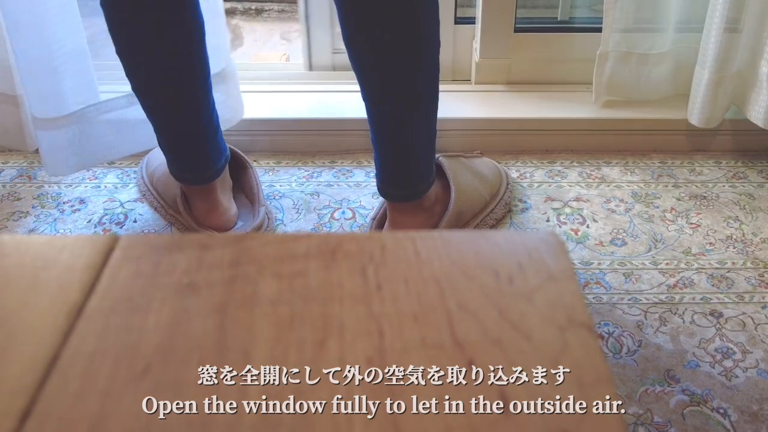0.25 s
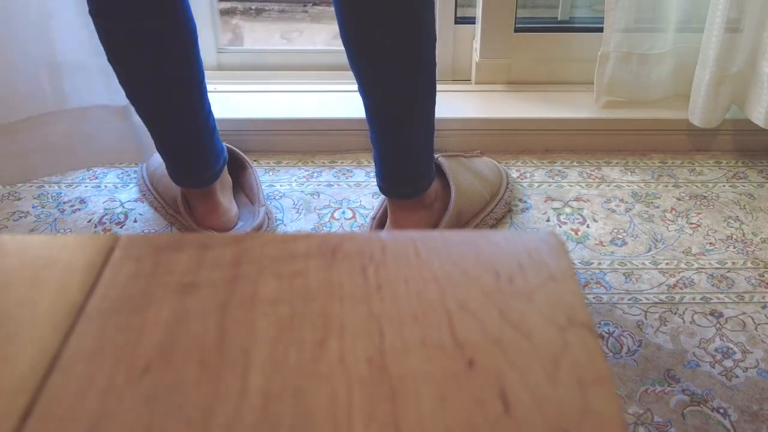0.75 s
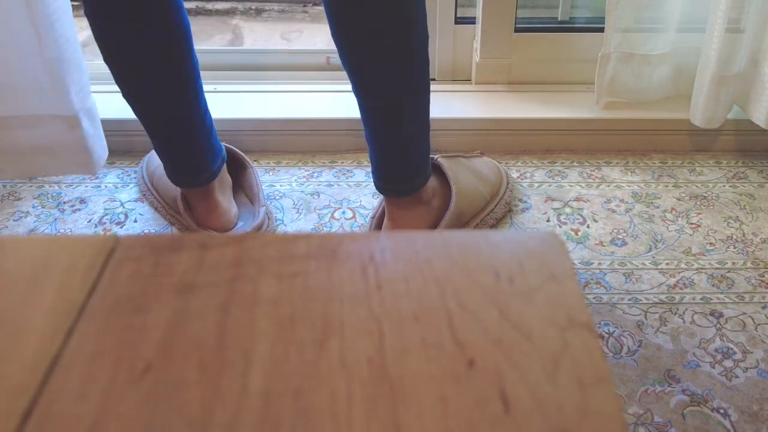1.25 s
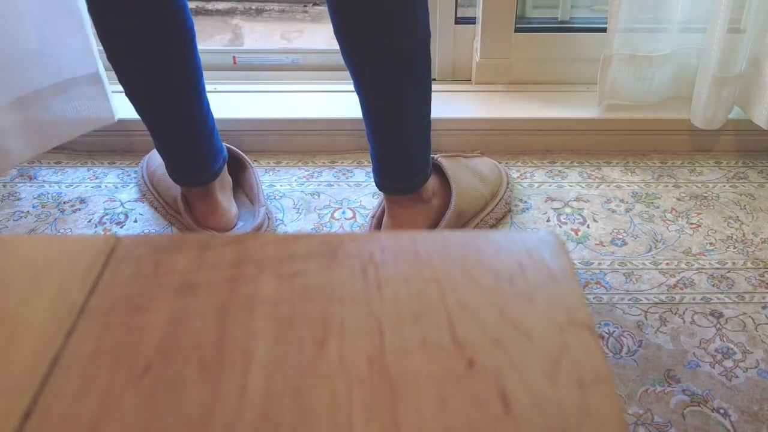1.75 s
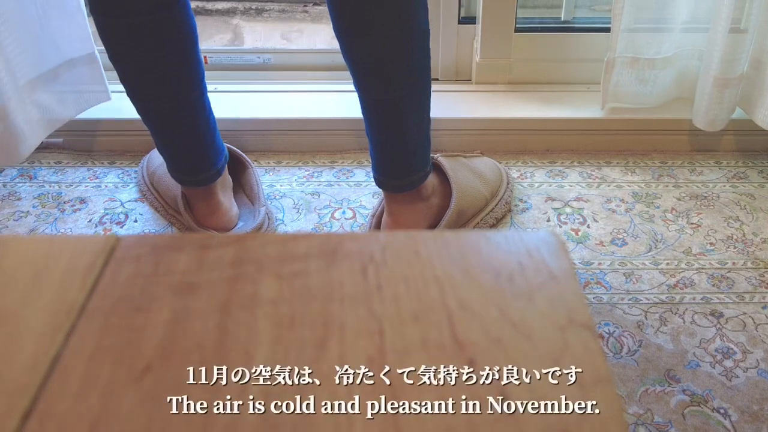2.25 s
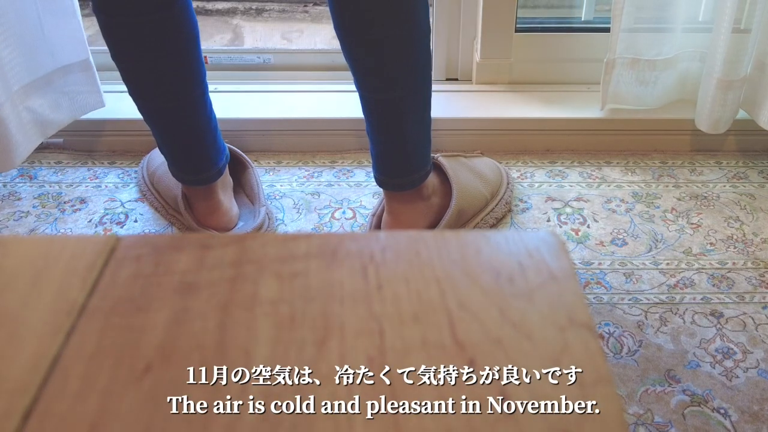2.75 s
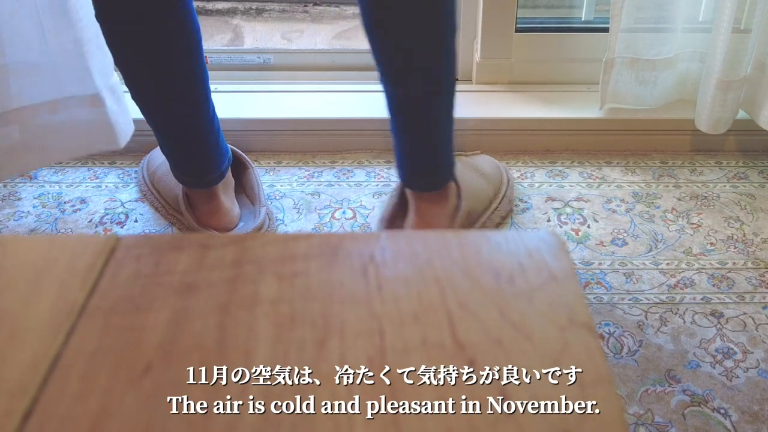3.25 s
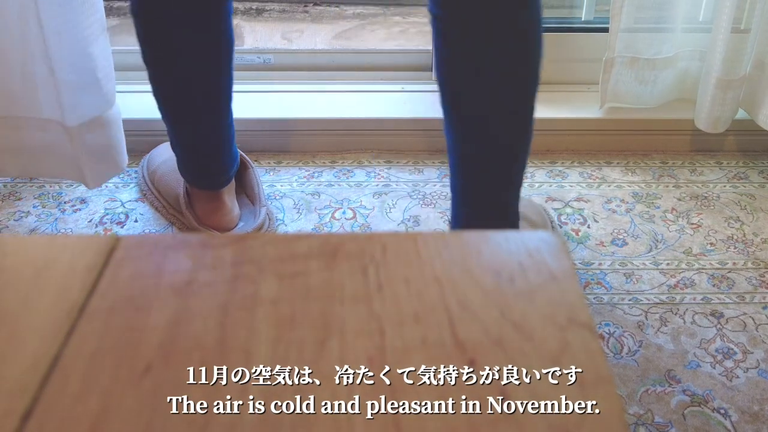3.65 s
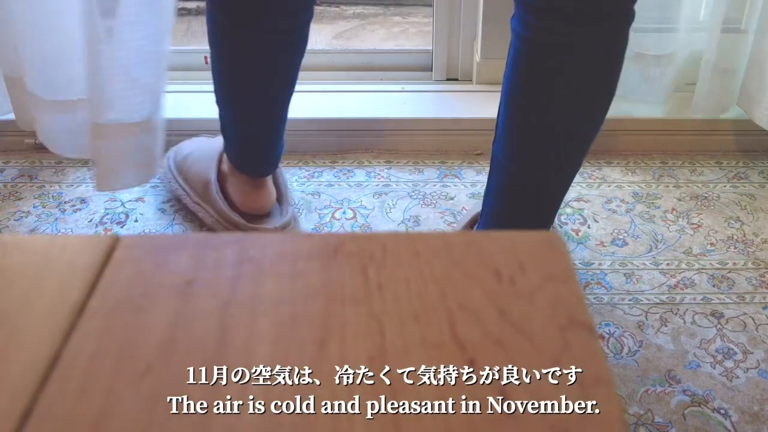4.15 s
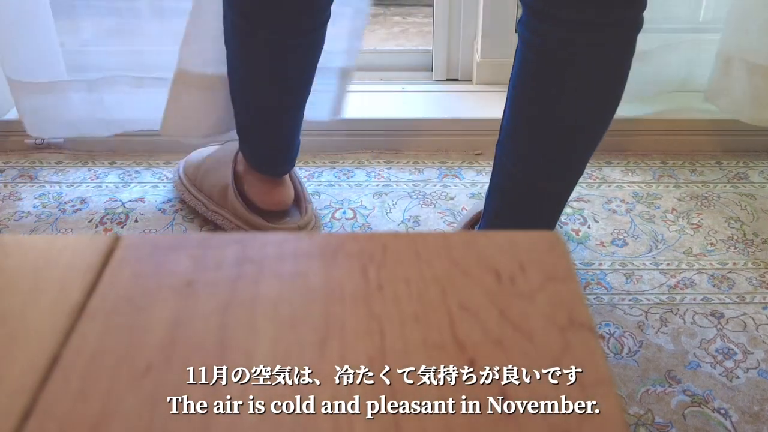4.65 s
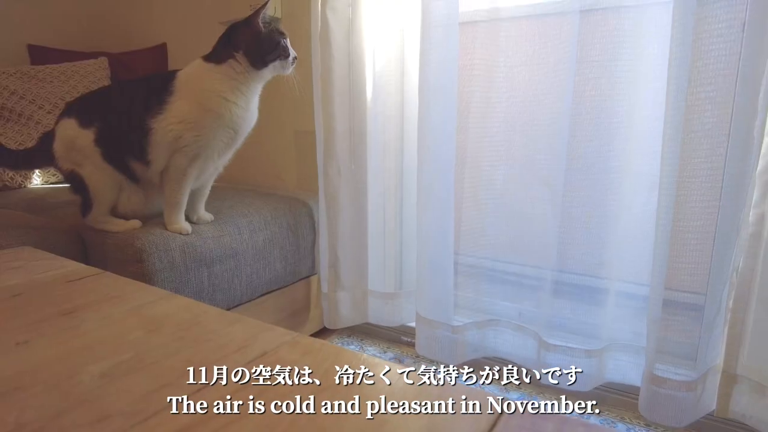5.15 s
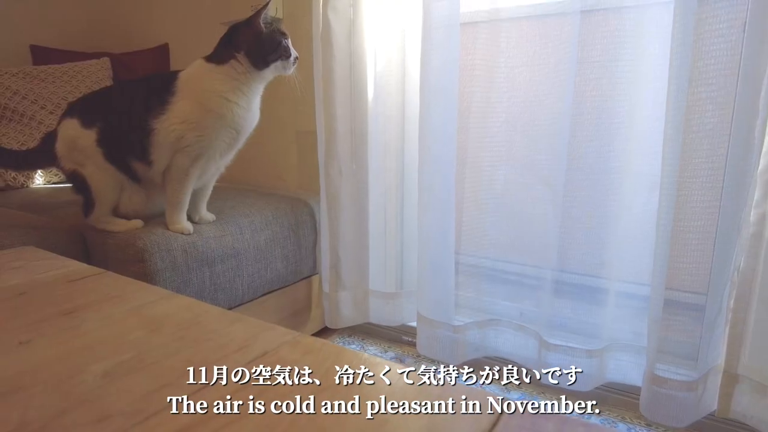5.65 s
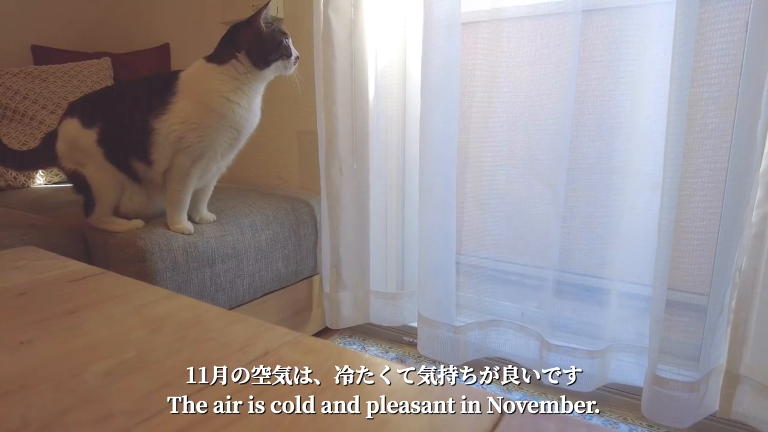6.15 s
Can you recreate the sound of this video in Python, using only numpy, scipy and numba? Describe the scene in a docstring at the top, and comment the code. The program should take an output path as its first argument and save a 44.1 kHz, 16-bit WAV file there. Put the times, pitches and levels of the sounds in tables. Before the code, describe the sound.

In a carpeted room, a sliding glass window rolls open in two pushes, rumbling, clicking and creaking on its track. Soft, low knocks shake the wall as it stops. Slippers scuff faintly on the carpet, then a curtain is drawn with a bright rattle of gliders that cuts off abruptly. A barely audible cricket trills once over faint outside air and a deep hum. The sounds seem close to the microphone.

```python
"""Over faint outside air and a deep hum, a glass sash rolls open in two pushes in a carpeted room.
Its wheels jolt on the rail, seal and frame creak, the pane sings, and soft knocks shake the wall as it
meets its stop. A faint high hiss swells and fades, and slippers scuff the carpet. A curtain is drawn,
its gliders rattling and clacking, and cuts off in a brief dip in level. A cricket trills once over the
air and hum, which remain."""
import sys
import numpy as np
from scipy import signal
from scipy.fft import rfft, irfft, next_fast_len
from scipy.io import wavfile
from scipy.ndimage import uniform_filter1d
from numba import njit

SR = 44100
rng = np.random.default_rng(int(sys.argv[2]) if len(sys.argv) > 2 else 0)


def transcribe(u):
    """Save the signal u as a 16-bit wav file named by the first command-line argument.

    u: samples, shape (n,) or (channels, n), limited to [-1, 1]; the rate is SR.
    q: integer samples, one column per channel.
    """
    v = np.clip(np.atleast_2d(u).T, -1, 1)
    q = np.round(v * 32767).astype(np.int16)
    wavfile.write(sys.argv[1], SR, q)


N = 281799
TIME_S = np.arange(N) / SR
FFT_SIZE = next_fast_len(N + SR)
BIN_HZ = np.maximum(np.arange(FFT_SIZE // 2 + 1) * SR / FFT_SIZE, 1)
LEFT_RIGHT = np.array([[1], [-1]])


def from_db(db):
    """Decibels to gain."""
    return 10 ** (np.asarray(db) / 20)


def unit_rms(x):
    """Scale to rms 1."""
    return x / np.sqrt(np.mean(x ** 2) + 1e-20)


def faders(rows):
    """A soft gate open from first row to last, then each level column as a curve in time."""
    times, *columns = np.transpose(rows)
    gate = (TIME_S >= times[0]) & (TIME_S < times[-1])
    return [uniform_filter1d(gate * 1., size=400)] + [np.interp(TIME_S, times, c) for c in columns]


def swells(events):
    """Gain that climbs 20 dB in each rise time and drops 20 dB in each fall time."""
    return sum(from_db(db - 20 * np.maximum((peak_s - TIME_S) / rise, (TIME_S - peak_s) / fall))
               for peak_s, rise, fall, db in events)


def over_pitch(points):
    """Join points on a log frequency axis."""
    hz, values = np.transpose(points)
    return np.interp(np.log(BIN_HZ), np.log(hz), values)


def drift(rate_hz):
    """A slow random wander with spread 1."""
    step = 40
    pole = np.exp(-2 * np.pi * rate_hz * step / SR)
    slow = signal.lfilter([1], [1, -2 * pole, pole * pole], rng.standard_normal(N // step + 2002))[2000:]
    return np.interp(np.arange(N) / step, np.arange(len(slow)), unit_rms(slow))


def grains(per_s, spread_db, clump_db):
    """Two unrelated streams of tiny random contacts that come in clumps."""
    sizes = from_db(spread_db * np.minimum(rng.exponential(1, (2, N)), 4)) * rng.choice([-1, 1], (2, N))
    return sizes * (rng.random((2, N)) < per_s / SR) * from_db(clump_db * drift(26))


def body(pair, colour, image, modes=(), lag_ms=0):
    """Give two streams a colour and resonances, then spread them as mid and side; rms 1."""
    lift = 1 + sum((from_db(2 * db) - 1) / (1 + (2 * (BIN_HZ - hz) / width) ** 2)
                   for hz, width, db in modes)
    cepstrum = irfft(np.log(from_db(over_pitch(colour)) * np.sqrt(np.maximum(lift, .01))), FFT_SIZE)
    cepstrum[1:FFT_SIZE // 2] *= 2   # minimum phase: the ring follows the contact
    cepstrum[FFT_SIZE // 2 + 1:] = 0
    mid, side = rfft(pair, FFT_SIZE) * np.exp(rfft(cepstrum))
    alike = np.clip(over_pitch(image), -1, 1)
    stereo = np.sqrt(1 + alike) * mid + np.sqrt(1 - alike) * side * LEFT_RIGHT
    left_late = np.exp(-1j * np.pi * BIN_HZ * lag_ms / 1000 * LEFT_RIGHT)
    return unit_rms(irfft(left_late * stereo, FFT_SIZE)[:, :N])


def patchy(x, spread_db, patch_s, patch_hz):
    """Contact changes along the way: each region of pitch swells and fades on its own."""
    _, _, cells = signal.stft(x, nperseg=512)
    field = rng.standard_normal(cells.shape[1:])
    for axis, size in enumerate((patch_hz * 512 / SR, patch_s * SR / 256)):
        for _ in range(2):
            field = uniform_filter1d(field, size=int(size) + 1, axis=axis)
    _, mottled = signal.istft(cells * from_db(spread_db * unit_rms(field)), nperseg=512)
    return unit_rms(mottled[:, :N])


def strikes(events, modes, crack_t60_s=0.0061, crack_band_hz=(250, 9100), scatter_db=1.5):
    """Each hit is a short bright crack plus ringing modes, weighted by distance from its pitch."""
    start_s, ring_db, pitch_hz, rolloff, crack_db = np.transpose(events)
    onsets = (start_s * SR).astype(int)
    scatter = rng.normal(0, scatter_db, (len(onsets), len(modes)))
    clicks = np.full(N, 1e-18)
    clicks[onsets] = from_db(crack_db)
    burst = signal.lfilter([1], [1, -from_db(-60 / (crack_t60_s * SR))], clicks) * rng.standard_normal(N)
    out = signal.sosfilt(signal.butter(1, crack_band_hz, "band", fs=SR, output="sos"), burst)
    for k, (hz, db, t60) in enumerate(modes):
        pole, angle = from_db(-60 / (t60 * SR)), 2 * np.pi * hz / SR
        clicks[onsets] = from_db(ring_db + db - np.abs(rolloff * np.log2(hz / pitch_hz)) + scatter[:, k])
        ring = signal.lfilter([0, np.sin(angle)], [1, -2 * pole * np.cos(angle), pole * pole], clicks)
        out += ring * (-1) ** k
    return out


@njit
def resonance(x, hz, width_hz):
    """A gliding two-pole resonance; noise keeps its level."""
    y = np.zeros_like(x)
    pole = np.exp(-np.pi * width_hz / SR)
    for i in range(2, len(x)):
        feedback = 2 * pole * np.cos(2 * np.pi * hz[i] / SR) * y[i - 1] - pole * pole * y[i - 2]
        y[i] = np.sqrt((1 - pole * pole) / 2) * (x[i] - x[i - 2]) + feedback
    return y


def friction_tones(events):
    """Uneven slips excite two gliding resonances, each passed twice to keep its skirts dark."""
    out = np.zeros(N)
    pair = [unit_rms(slips) for slips in grains(8000, 2.6, 0.6)]
    for peak_s, rise, fall, db, first_hz, second_hz, glide, width, second_db in events:
        span = slice(max(int((peak_s - 2 * rise) * SR), 0), int((peak_s + 2 * fall) * SR))
        bend = 2 ** (glide * np.clip((TIME_S[span] - peak_s) / (rise + fall), -1, 1))
        for slips, hz, level_db in zip(pair, (first_hz, second_hz), (db, db + second_db)):
            tone = resonance(resonance(slips[span], hz * bend, width), hz * bend, width)
            out[span] += swells([(peak_s, rise, fall, level_db)])[span] * tone * np.sqrt(width / SR * 3)
    return out


# Ambience faders: time_s, air_db, deep_hum_db, second_hum_db
AMBIENCE_LEVELS = [(0, -70, -51, -62), (.7, -64, -56, -57.5), (1.1, -64, -52, -58.5),
                   (1.7, -60.5, -53, -51.5), (2.3, -68, -52, -59), (2.53, -65, -55, -67.5),
                   (2.85, -69, -54, -60.5), (3.33, -67, -51.5, -61.5), (3.6, -72, -57, -62),
                   (3.85, -71, -56, -65.5), (4.2, -66.5, -51, -72), (5.0, -67.5, -54.5, -61),
                   (5.75, -67.5, -55, -68.5), (6.39, -69.5, -59.5, -57.5)]
# Dark tone of the air: pitch_hz, level_db
AIR_COLOUR = [(35, -45.5), (60, 0), (103, -3), (156, -15), (397, -13), (436, -19.5), (489, -14.5),
              (711, -17), (898, -23), (1370, -23), (2450, -29), (3020, -29.5), (5280, -35.5), (5800, -33),
              (15800, -49)]
# Centred lows, wide highs: pitch_hz, stereo_correlation
AIR_IMAGE = [(60, 1), (180, 0.96), (550, 0.16), (1650, 0.077), (4970, -0.055), (15000, -0.16)]
# The two hums: pitch_hz, waver_hz, steady_to_waver_ratio
HUMS = [(28.5, 2.5, 1.2), (50, 4.0, 0.3)]


def ambience(hum_side_db=-18):
    """A bed of smooth outside air and two deep hums that swell and fade by chance."""
    _, air_db, *hum_db = faders(AMBIENCE_LEVELS)
    out = from_db(air_db) * body(rng.standard_normal((2, N)), AIR_COLOUR, AIR_IMAGE)
    for (hz, waver_hz, steady), db in zip(HUMS, hum_db):
        mid = steady * np.sqrt(2) + drift(waver_hz) + 1j * drift(waver_hz)
        side = drift(waver_hz) + 1j * drift(waver_hz)
        swing = mid + from_db(hum_side_db) * side * LEFT_RIGHT
        out += from_db(db) * np.real(swing * np.exp(2j * np.pi * hz * TIME_S)) / np.sqrt(1 + steady ** 2)
    return out


# Two pushes on the sash: time_s, frame_db, pane_db
PUSHES = [(0.0, -46, -41.5), (0.13, -66.5, -61), (0.2, -64.5, -70), (0.26, -58, -62), (0.31, -52, -44.5),
          (0.36, -54, -48.5), (0.4, -48.5, -47.5), (0.49, -56.5, -49), (0.54, -55, -48.5),
          (0.6, -56, -52.5), (0.74, -54, -46.5), (0.82, -56, -48.5), (0.88, -55, -47.5), (0.93, -55, -53),
          (1.04, -67.5, -71), (1.14, -60.5, -56), (1.29, -56.5, -48.5), (1.42, -54, -53), (1.5, -56, -52),
          (1.56, -53, -51), (1.63, -58.5, -55), (1.69, -55, -53.5), (1.82, -60, -63.5), (2.03, -58.5, -66),
          (2.09, -55.5, -49), (2.2, -86, -69.5), (2.35, -82.5, -93)]
# Pane rumble, frame rattle, seal hiss and seal snap: pitch_hz, level_db
PANE_COLOUR = [(24, -26), (40, -7.5), (193, -14), (236, -17.5), (275, -18), (358, -15), (399, -18),
               (634, -14.5), (799, -21.5), (1600, -26), (2080, -46.5), (3520, -120)]
FRAME_COLOUR = [(410, -20.5), (700, -4.5), (773, -11.5), (1100, -15.5), (1390, -7.5), (1750, -9),
                (2720, -8.5), (3530, -16), (6000, -22.5), (7800, -28), (13200, -120)]
SEAL_COLOUR = [(1760, -19), (3000, -5.5), (3570, -12.5), (4370, -11), (6770, -26), (7780, -13),
               (11600, -25.5), (14500, -23), (15800, -24)]
SNAP_COLOUR = [(2000, -21), (4000, -4), (7500, -11), (10000, -7), (13000, -13), (15800, -1)]
# Their peaks and notches: pitch_hz, width_hz, lift_db
PANE_MODES = [(72, 10, 6), (150, 9, 7), (235, 7, 11), (295, 50, -5), (358, 11, 9), (435, 8, 10),
              (500, 14, 3), (545, 40, -4), (605, 13, 7), (642, 13, 8), (705, 14, 7), (790, 60, -4),
              (890, 30, 4)]
FRAME_MODES = [(1196, 25, -26), (1230, 39, 1), (1345, 23, -2), (2200, 65, 4.5), (2430, 40, 3.5),
               (2800, 44, 7), (3080, 45, 2), (4350, 240, 2)]
SEAL_MODES = [(8300, 380, -15)]
# The seal breaks free: peak_s, rise_s, fall_s, level_db
SEAL_RELEASE = [(.271, 0.0036, 0.071, -42.5)]
# Stereo image of the sash: pitch_hz, stereo_correlation
SASH_IMAGE = [(60, 1), (200, 0.82), (330, 1), (600, 0.29), (1500, 0.89), (4000, 0.29), (15000, 0.091)]
SASH_LAG_MS = -0.03


def sash_roll(seal_below_frame_db=5.5):
    """Wheels on a rough track shake pane and frame; the brush seal snaps free and hisses along."""
    gate, frame_db, pane_db = faders(PUSHES)
    rumble = body(grains(2400, 2.64, 1.0), PANE_COLOUR, SASH_IMAGE, PANE_MODES, SASH_LAG_MS)
    pane = from_db(pane_db) * patchy(rumble, 1.3, .15, 60)
    rattle = body(grains(4000, 1.8, 0.85), FRAME_COLOUR, SASH_IMAGE, FRAME_MODES, SASH_LAG_MS)
    frame = from_db(frame_db) * patchy(rattle, 1.44, .03, 400)
    bristles = body(grains(15000, 3.1, 0.81), SEAL_COLOUR, SASH_IMAGE, SEAL_MODES, SASH_LAG_MS)
    seal = from_db(frame_db - seal_below_frame_db) * patchy(bristles, 3.0, .04, 700)
    snap = body(grains(12000, 3.0, 0.5), SNAP_COLOUR, SASH_IMAGE, lag_ms=SASH_LAG_MS)
    return gate * (pane + frame + seal + swells(SEAL_RELEASE) * snap)


# Wheel hits: start_s, ring_db, pitch_hz, rolloff_db_per_octave, crack_db
JOLTS = [(.004, -35.5, 1240, 17, -49), (.270, -32, 3080, 26, -36), (.292, -60, 2800, 22, -60),
         (.295, -46.5, 680, 12, -56), (.319, -35.5, 4350, 11, -57), (.373, -32.5, 1210, 24, -64),
         (.377, -36.5, 2680, 5, -66), (.389, -35.5, 1700, -7, -67), (.415, -39, 1280, 12, -65),
         (.431, -38, 1280, 25, -65), (.657, -41.5, 1330, 10, -59), (.687, -49, 1330, 20, -62),
         (.764, -43, 744, 4, -70), (.847, -61, 1290, 12, -66), (.878, -45, 1440, 8, -63),
         (1.118, -51, 2710, 20, -66), (1.29, -44, 1380, 5.5, -73), (1.357, -40.5, 2820, 10, -59),
         (1.403, -60, 2770, 21, -66), (1.42, -40, 1480, 22, -53), (1.432, -44, 4280, 12, -66),
         (1.488, -55, 1420, 23, -70), (1.544, -41, 1440, 21, -62), (1.69, -45, 2350, 9, -70),
         (1.854, -42, 2960, 29, -72), (1.937, -45.5, 2320, 13, -68), (1.956, -45, 2620, 11, -69),
         (2.003, -49, 2670, 21, -76), (2.042, -40.5, 1470, 45, -69), (2.593, -59, 2700, 9, -55),
         (2.621, -50, 2270, 5, -52), (2.945, -58.5, 2160, 22, -71)]
# Their bright ring: pitch_hz, level_db, t60_s
JOLT_MODES = [(662, -13, 0.21), (691, 7.5, 0.038), (1035, -10, 0.17), (1143, -22, 0.22),
              (1293, -2.5, 0.039), (1428, -10.5, 0.11), (2097, -13.5, 0.15), (2648, -4.5, 0.056),
              (3075, -4, 0.02), (3720, -17, 0.052), (4440, -19.5, 0.073), (5170, -11, 0.028),
              (6300, -25, 0.042), (7500, -15, 0.044)]


def wheel_jolts():
    """The wheels jolt over the rail with ringing clicks."""
    return strikes(JOLTS, JOLT_MODES)


# Creaks: peak_s, rise_s, fall_s, level_db, first_hz, second_hz, glide_octaves, width_hz, second_gain_db
CREAKS = [(.188, 0.014, 0.067, -56, 1930, 2640, -0.48, 298, -22),
          (.24, 0.12, 0.093, -54, 1770, 2700, -0.03, 300, -7),
          (0.385, 0.022, 0.045, -41, 1190, 2560, -0.056, 200, -14),
          (.41, 0.058, 0.052, -43.5, 1180, 2230, 0.16, 206, -2),
          (.55, 0.07, 0.03, -52.5, 1160, 2240, -0.22, 200, -20),
          (.635, 0.016, 0.026, -58, 4900, 6250, -0.09, 350, -3),
          (.725, 0.051, .04, -55, 3320, 4860, 0.098, 350, -10),
          (.77, 0.029, 0.059, -47.5, 1465, 2720, 0.13, 250, -30),
          (.92, 0.096, 0.027, -61, 1300, 2720, -0.11, 252, -13),
          (.96, 0.066, .07, -58, 3100, 4280, -0.17, 350, -22),
          (1.13, 0.066, 0.087, -58, 2700, 4500, -0.23, 350, -32),
          (1.3, 0.032, 0.11, -50.5, 1410, 2710, -0.014, 250, -20),
          (1.424, 0.0078, 0.096, -46.5, 1440, 4170, 0.095, 200, -12),
          (1.432, .01, .04, -63, 6300, 7900, 0., 300, -5),
          (1.56, 0.096, 0.17, -57.5, 1360, 2600, -0.2, 250, -1),
          (2.2, .04, 0.18, -76.5, 11100, 7740, 0.049, 600, -2),
          (2.53, 0.067, .08, -80, 10900, 7700, 0., 600, -8),
          (2.75, 0.03, 0.085, -63, 3360, 4220, 0.021, 330, -7),
          (2.947, 0.0034, 0.075, -81, 1570, 2660, 0., 150, -1),
          (3.04, 0.03, 0.11, -71.5, 1590, 3420, 0.16, 500, 8.5),
          (3.06, 0.052, 0.079, -69, 4000, 2580, 0.64, 300, 13),
          (3.092, 0.057, 0.036, -53.5, 1810, 3060, 0.12, 380, 0.5),
          (3.15, 0.1, 0.11, -75, 1800, 2970, 0.097, 350, 2),
          (3.18, 0.074, 0.056, -68, 3350, 4300, -0.019, 300, -11)]


def creaks():
    """Seal and frame slip in short, raspy creaks; the last few, after the sash has stopped, are slippers
    squeaking as they scuff."""
    return friction_tones(CREAKS)


# Glass: peak_s, rise_s, fall_s, level_db, first_hz, second_hz, glide_octaves, width_hz, second_gain_db
PANE_NOTES = [(.42, 0.17, .12, -55, 643, 359, 0.013, 11, -3),
              (.8, .3, 0.16, -49.5, 234.1, 363, 0., 7.5, -12),
              (.78, 0.093, 0.16, -66, 645, 439, 0., 8.8, -6),
              (1.35, 0.16, 0.66, -61.5, 232.3, 359, 0., 11, 5.5),
              (1.42, 0.36, 0.33, -57.5, 617.7, 434.5, 0., 7.1, 3),
              (1.7, .3, 0.23, -63.5, 235, 695, 0.016, 9, -3)]


def pane_song():
    """The pane sings in narrow, low resonances as it rolls."""
    return friction_tones(PANE_NOTES)


# Soft bumps: start_s, ring_db, pitch_hz, rolloff_db_per_octave, crack_db
KNOCKS = [(.766, -49, 298, 17, -78), (1.305, -72, 150, -1, -68), (2.078, -39.5, 266, 18, -74),
          (2.092, -31.5, 284, 16.5, -75), (2.619, -37, 176, 8, -52), (2.62, -35.5, 68, 16, -70),
          (2.684, -42, 80, 3, -72), (2.742, -43.5, 73, 5, -57)]
# Their low thud: pitch_hz, level_db, t60_s
KNOCK_MODES = [(68, -0.5, 0.2), (97, 3, 0.091), (125, 0.5, 0.047), (160, 1, 0.057), (191, -11, 0.1),
               (265, -7, 0.069), (394, -6.5, 0.052), (480, -13, 0.061), (740, -3, 0.053), (1000, -5, 0.038)]


def sash_knocks():
    """The heavy sash bumps along and meets its stop."""
    return strikes(KNOCKS, KNOCK_MODES)


# Shudders: peak_s, rise_s, fall_s, level_db
SHUDDERS = [(2.1, 0.1, 0.075, -52), (2.6, 0.026, 0.033, -50.5), (2.625, 0.013, 0.18, -43.5)]
# Boom of the wall: pitch_hz, level_db
WALL_COLOUR = [(35, -28), (60, -4.5), (81, -6), (139, -13), (329, -18.5), (361, -16.5), (728, -28),
               (898, -31), (1430, -28), (3810, -39.5), (7850, -47), (15800, -73)]


def wall_shudder():
    """The wall shakes after the hardest knocks."""
    return swells(SHUDDERS) * body(grains(8000, 1.63, 0.48), WALL_COLOUR, SASH_IMAGE, lag_ms=SASH_LAG_MS)


# Swells of hiss: peak_s, rise_s, fall_s, level_db
HISS_SWELLS = [(2.188, 0.19, 0.078, -67), (2.48, 0.57, 1, -76.5), (2.62, 0.041, 0.2, -67),
               (3.09, 0.087, 0.13, -67.5), (3.75, 0.54, 0.97, -76.5)]
# Bright tone of the hiss: pitch_hz, level_db
HIGH_HISS_COLOUR = [(5000, -2), (7800, -2), (9500, -2.5), (11000, -9), (12500, -6), (14000, -4.5),
                    (16000, -10)]


def treble_hiss():
    """A faint, fine-grained high hiss swells and fades."""
    return swells(HISS_SWELLS) * body(grains(21000, 3.0, 1.0), HIGH_HISS_COLOUR, AIR_IMAGE)


# Footsteps: peak_s, rise_s, fall_s, level_db
SCUFFS = [(3.095, 0.13, 0.15, -65), (3.374, 0.22, 0.13, -71), (3.58, 0.2, 0.11, -78.5),
          (3.906, 0.12, 0.25, -66)]
# Rustle on carpet: pitch_hz, level_db
SCUFF_COLOUR = [(180, -55.5), (300, -24), (416, -15), (523, -6), (1110, 5), (3860, -1), (4180, 2),
                (4770, -5.5), (15000, -25)]
# Stereo image of slippers and curtain: pitch_hz, stereo_correlation
INDOOR_IMAGE = [(100, 0.56), (300, 1), (600, 0.12), (1200, 0.68), (3500, 0.28), (15000, 0.049)]


def slippers():
    """Soles and hems brush the carpet with a soft, wide rustle."""
    return swells(SCUFFS) * body(grains(10000, 3.2, 0.53), SCUFF_COLOUR, INDOOR_IMAGE)


# Curtain faders, before trim: time_s, gliders_db, hiss_db
CURTAIN_PULL = [(4.03, -74, -98), (4.048, -60.5, -73), (4.062, -52.5, -64), (4.074, -58, -74),
                (4.084, -44.5, -62), (4.098, -52, -60), (4.104, -45.5, -62), (4.166, -43, -49.5),
                (4.184, -38, -52.5), (4.216, -39, -49), (4.29, -38.5, -52.5), (4.352, -40, -55.5),
                (4.394, -37, -49.5), (4.448, -37.5, -49.5), (4.552, -47.5, -61.5), (4.619, -51.5, -64),
                (4.623, -41, -54), (4.646, -49.5, -59.5), (4.772, -64, -84), (4.8, -75, -90),
                (4.81, -95, -105)]
# Rail rattle, fine rail hiss and cloth swish: pitch_hz, level_db
RAIL_COLOUR = [(530, -58.5), (900, -36), (1190, -25), (1390, -6), (1540, -10.5), (2350, -3), (2880, 2.5),
               (4180, 1.5), (5060, -2.5), (6500, -11), (9000, -37), (15800, -81)]
RAIL_HISS_COLOUR = [(4000, -32), (6500, -4.5), (8000, -1.5), (11000, -7.5), (13500, -12.5), (15300, -24),
                    (15800, -55)]
CLOTH_COLOUR = [(120, -68), (165, -26), (210, -10), (300, -1), (420, -4.5), (560, -6), (740, -0.5),
                (1000, -8), (1500, -7), (2500, -43.5)]
# Ring of the rail: pitch_hz, width_hz, lift_db
RAIL_MODES = [(1400, 70, 3.5), (1790, 60, 2), (2160, 35, 4), (2700, 60, 3), (2940, 60, 4), (3335, 50, 4.5),
              (3470, 70, 6.5), (3700, 35, 5), (3880, 50, 1), (4145, 45, 7), (4670, 50, 3), (5500, 120, 2),
              (5900, 80, 3)]


def curtain(glider_trim_db=2.5, hiss_trim_db=1.5, cloth_peak_db=-50, cloth_follow=0.61, lag_ms=0.072):
    """A crowd of small gliders rattles along the rail while the cloth swings with the pull."""
    gate, gliders_db, hiss_db = faders(CURTAIN_PULL)
    contacts = grains(4500, 2.2, 0.52)
    rattle = body(contacts, RAIL_COLOUR, INDOOR_IMAGE, RAIL_MODES, lag_ms)
    gliders = from_db(gliders_db + glider_trim_db) * patchy(rattle, 1.17, .015, 400)
    hiss = from_db(hiss_db + hiss_trim_db) * body(contacts, RAIL_HISS_COLOUR, INDOOR_IMAGE, lag_ms=lag_ms)
    swish = body(grains(5000, 1.93, 0.5), CLOTH_COLOUR, INDOOR_IMAGE, lag_ms=lag_ms)
    cloth_db = cloth_peak_db + cloth_follow * (gliders_db - gliders_db.max())
    cloth = from_db(cloth_db) * patchy(swish, 2.5, .03, 200)
    return gate * (gliders + hiss + cloth)


# Glider hits: start_s, ring_db, pitch_hz, rolloff_db_per_octave, crack_db
CLACKS = [(4.046, -47.5, 3360, 15, -72), (4.102, -43, 4160, 7, -56), (4.219, -36, 3500, 10.5, -55),
          (4.404, -36, 4070, 16.5, -52.5), (4.424, -50, 3530, 10, -48.5), (4.621, -45, 4200, 26, -35)]
# Their thin ring: pitch_hz, level_db, t60_s
CLACK_MODES = [(2780, 4.5, 0.032), (3500, -13, 0.022), (4210, -1.5, 0.13), (5200, -20, 0.017),
               (6300, -2, 0.036), (7860, -9.5, 0.031)]


def glider_clacks():
    """Gliders run into each other with sharp little clacks."""
    return strikes(CLACKS, CLACK_MODES)


def cricket(start_s=4.856, end_s=5.292, pitch_hz=5730, level_db=-87, pulses_per_s=29.8):
    """A cricket outside trills once: a high, wavering tone in quick pulses."""
    gate = (TIME_S > start_s) & (TIME_S < end_s)
    pulses = np.sin(np.pi * pulses_per_s * (TIME_S - start_s)) ** 2
    gain = from_db(level_db + 3 * drift(15))
    return gate * gain * pulses * np.sin(2 * np.pi * pitch_hz * TIME_S + drift(40))


def room(send, bass_t60_s=0.53, damping_hz=4900, mono_below_hz=350, low_cut_hz=79):
    """Eight feedback delays a side; walls swallow treble and the open window lets deep bass out."""
    t60 = bass_t60_s / (1 + BIN_HZ / damping_hz)
    wet = np.zeros((2, len(BIN_HZ)), complex)
    for k, lag_s in enumerate(rng.uniform(0.0091, 0.049, 16)):
        loop = from_db(-60 * lag_s / t60) * np.exp(-2j * np.pi * BIN_HZ * lag_s)
        wet[k % 2] += loop / (1 - loop) * (-1) ** (k // 2)
    wet += (wet[::-1] - wet) / 2 / (1 + (BIN_HZ / mono_below_hz) ** 4)   # long waves reach both sides
    wet /= 1 + (low_cut_hz / BIN_HZ) ** 4
    return irfft(wet * rfft(send, FFT_SIZE), FFT_SIZE)[:, :N]


DIP_START_S, DIP_END_S, DIP_DB = 4.804, 4.813, -14


def scene(accent_send_db=-11.5, slide_send_db=-14.5):
    """Sash and curtain ring in the room and stop short at the dip; the quiet layers stay dry."""
    accents = wheel_jolts() + sash_knocks() + glider_clacks() + creaks() + pane_song()
    slides = sash_roll() + wall_shudder() + curtain()
    reverb = room(from_db(accent_send_db) * accents + from_db(slide_send_db) * slides.mean(axis=0))
    foreground = (slides + accents + reverb) * (TIME_S < DIP_END_S)
    return foreground + slippers() + treble_hiss() + ambience() + cricket()


# Stereo tilt: pitch_hz, left_over_right_db
BALANCE = [(60, -1.5), (150, 1), (380, 0.5), (950, 3), (2380, 0.0), (5980, 0.0), (15000, 0.5)]


def record(dry, high_cut_hz=16050):
    """The level dips briefly, the balance leans with pitch, and the very top is cut."""
    dip_times = [DIP_START_S - .003, DIP_START_S, DIP_END_S, DIP_END_S + 0.0087]
    dip = from_db(np.interp(TIME_S, dip_times, [0, DIP_DB, DIP_DB, 0]))
    tilt = from_db(over_pitch(BALANCE) * LEFT_RIGHT / 2)
    balanced = irfft(rfft(dry * dip, FFT_SIZE) * tilt, FFT_SIZE)[:, :N]
    return signal.sosfilt(signal.cheby2(20, 70, high_cut_hz, fs=SR, output="sos"), balanced)


dry = scene()
out = record(dry)
transcribe(out)
```